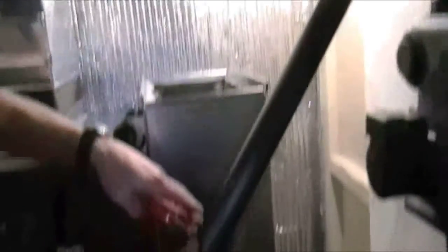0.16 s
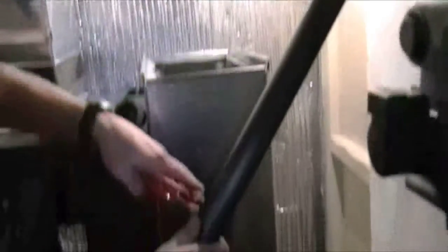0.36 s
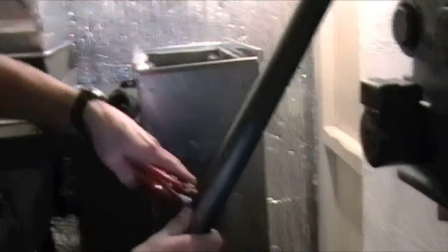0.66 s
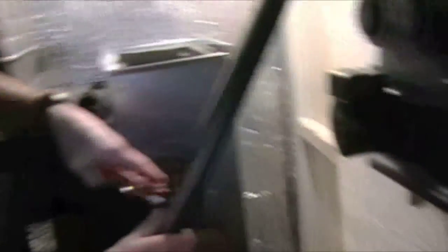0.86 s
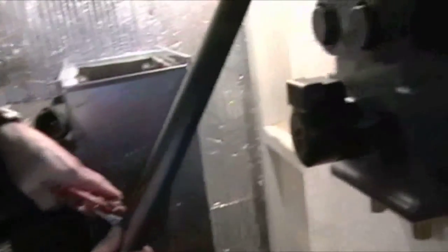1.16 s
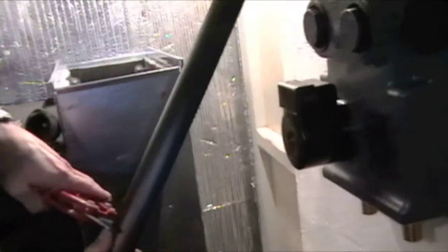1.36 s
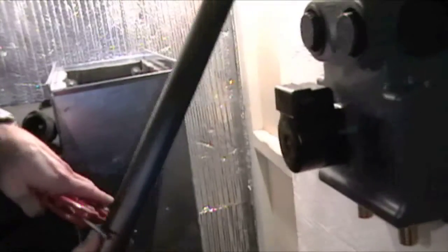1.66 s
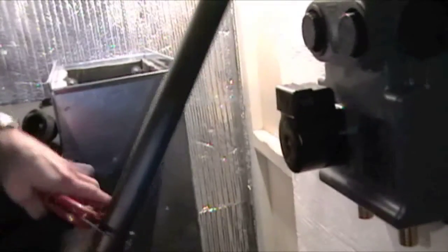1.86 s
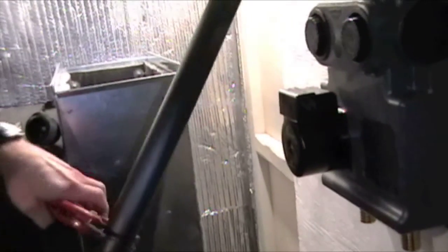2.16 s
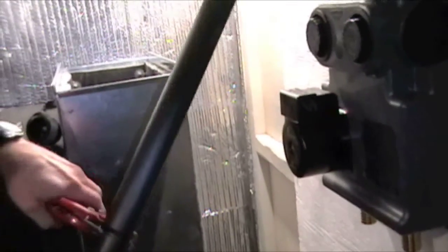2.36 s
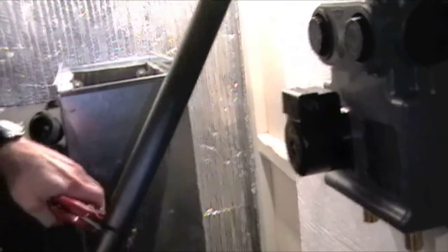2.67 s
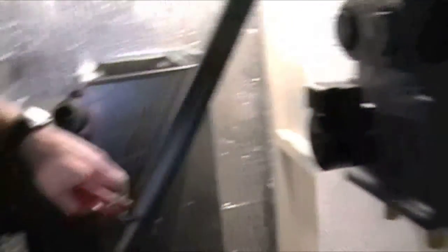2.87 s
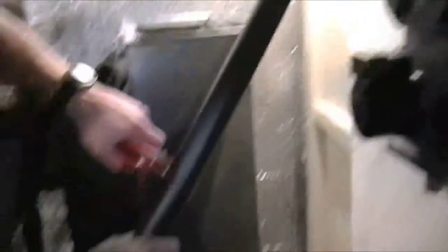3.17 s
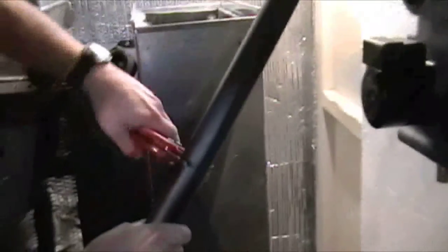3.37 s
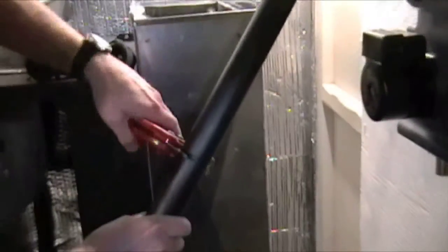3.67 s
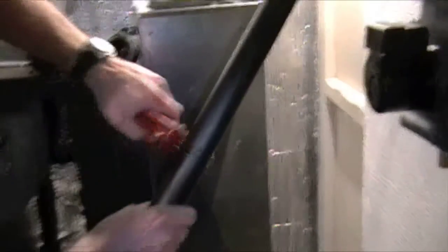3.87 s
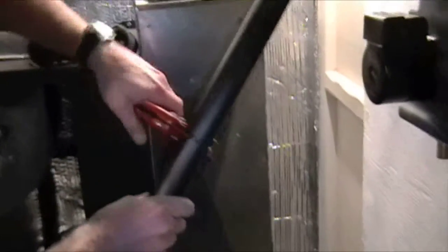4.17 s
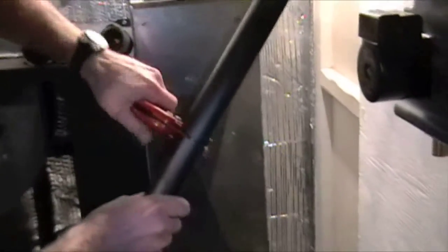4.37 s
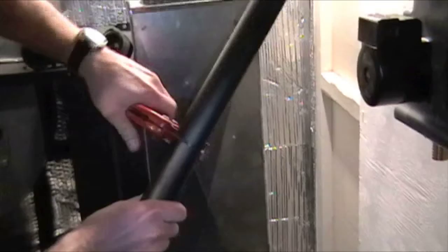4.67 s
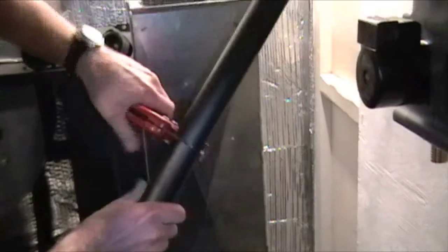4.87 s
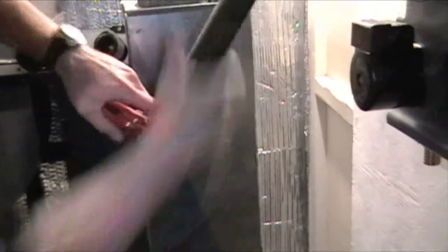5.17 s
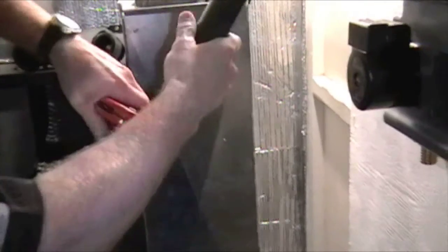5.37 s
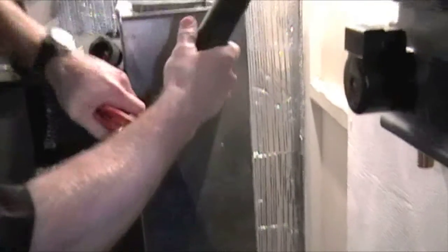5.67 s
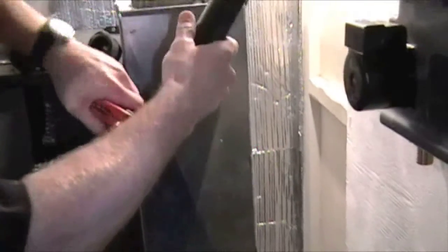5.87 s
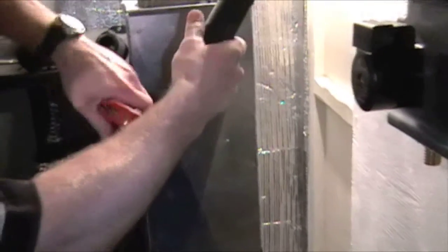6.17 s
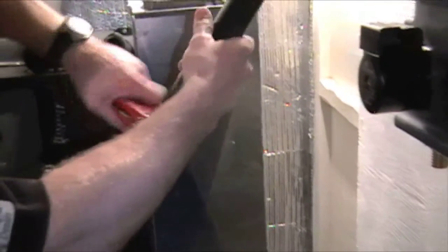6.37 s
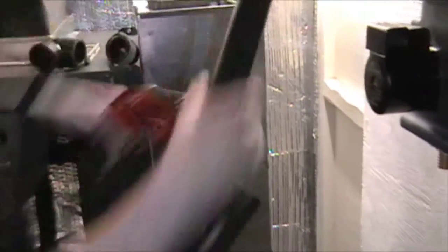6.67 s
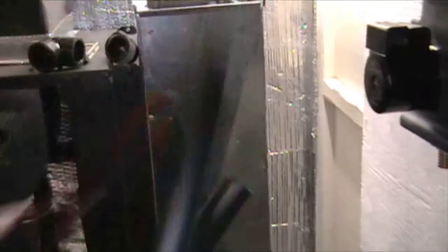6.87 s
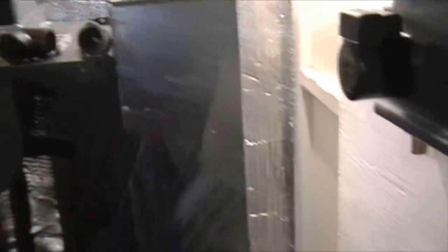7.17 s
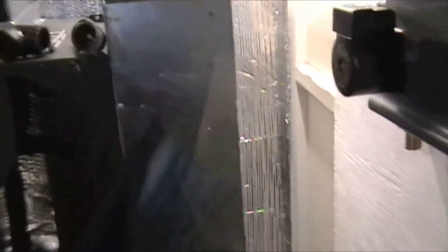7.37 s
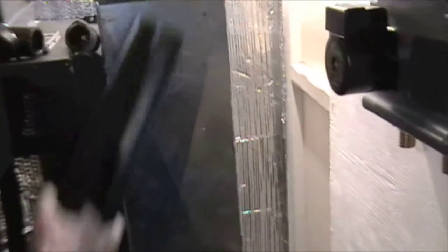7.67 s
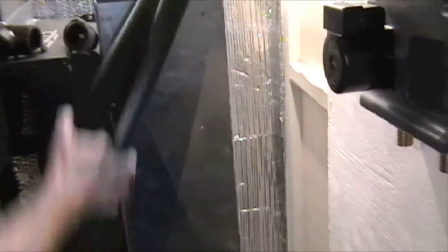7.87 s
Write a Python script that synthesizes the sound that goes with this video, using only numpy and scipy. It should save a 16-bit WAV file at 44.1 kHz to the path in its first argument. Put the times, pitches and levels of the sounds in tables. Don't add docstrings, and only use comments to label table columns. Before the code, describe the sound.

A small, hard-walled utility room heard close on a camcorder's stereo microphone, with soft air hiss, faint thin whine and a low pump hum that swells near 2 s. In the first second come only faint dull taps on the camera body. At 1.6 s the plastic pipe is knocked, hollow and short, followed by light clicks and a brush of hands at 1.8 s. From 3.1 s a ratchet cutter snaps hard: 3.15, 3.55, then about every 0.2 s until 5.7 s, each a chattering metallic crack with bright tick and quick room slap, lighter return clicks between. Blade scraping and rustling grow strongest around 5.2-6.2 s. More snaps cluster at 6.1-6.3 s, then after a pause two hollower cracks fall at 6.9 and 7.3 s. The pipe is set down with a hollow knock at 7.45 s, settles at 7.55 s, and fades into faint handling and hum.

```python
import sys
import numpy as np
from scipy import signal
from scipy.fft import rfft, irfft
from scipy.io import wavfile
from scipy.ndimage import uniform_filter1d

SR = 44100
rng = np.random.default_rng(int(sys.argv[2]) if len(sys.argv) > 2 else 0)


def gain_from_db(level_db):
    decades = np.asarray(level_db, float) / 20
    return 10 ** decades


def store_pcm(level_fs):
    pcm = np.round(np.clip(level_fs, -1, 1) * 32767).astype(np.int16)
    wavfile.write(sys.argv[1], SR, np.atleast_2d(pcm).T)


N = 353241
T = np.arange(N) / SR
HZ = np.fft.rfftfreq(N, 1 / SR)

# (time [s], tool level [dB], pipe level [dB], bright tick share [0-1], free ring [Hz])
SNAPS = [(3.148, -10, -36.5, 0.5, 5030), (3.559, -11, -38, 0.69, 5060), (3.8542, -9.5, -30.5, 0.39, 3480),
         (4.0633, -11, -29.5, 0.67, 1560), (4.2793, -8, -22, 0.32, 4880), (4.4878, -10.5, -46, 1, 2000),
         (4.568, -13, -34.5, .6, 3640), (4.6843, -8.5, -26.5, 0.58, 2670), (4.8886, -12, -31, 1, 6230),
         (5.0422, -8, -27, 0.47, 2810), (5.2954, -9, -40, 0.73, 2190), (5.5078, -9, -23, 0.39, 3910),
         (5.7189, -11.5, -63.5, 0.9, 2250), (6.086, -12, -32.5, .7, 3980), (6.1288, -14, -20.5, .05, 2190),
         (6.2734, -6, -26, 0.73, 5310), (6.8878, -12.5, -20.5, .6, 2280), (7.273, -11, -20, 0.6, 2800)]
RETURNS = [(1.8039, -30, -44, 0.49, 4650), (1.8514, -25, -31.5, 0.32, 4040),
           (3.1439, -17, -27.5, 0.69, 1974), (3.3253, -39.5, -44, 0.19, 2660),
           (4.0185, -33, -41.5, .05, 2650), (4.1544, -17.5, -36, 0.68, 4700),
           (4.4457, -34, -42.5, 0.86, 3600), (4.9401, -15, -27, .56, 2150), (5.3519, -24, -33, 0.15, 2226),
           (5.7678, -22, -32.5, .05, 4630), (5.7881, -14, -32.5, .83, 2340),
           (5.8832, -14.5, -26.5, 0.023, 4460), (6.0258, -36.5, -60, 0.83, 5790)]


def ratchet():
    return (blows(SNAPS, wet_db=-1.2, ring_db=-7.5, pawl_db=0, trim_db=0.22)
            + blows(RETURNS, wet_db=-1.0, ring_db=-3.5, pawl_db=0, trim_db=0.86))


# (frequency [Hz], width [Hz], level [dB])
PAWL = [(3830, 330, -18), (3980, 155, -2), (4664, 150, -4.5), (4920, 350, 4.5), (5650, 96, -23.5),
        (6230, 140, -9)]
# (frequency [Hz], level [dB], t60 [s])
PIPE = [(366, -18, 0.057), (446, -19.5, 1.3), (665.4, 10, 0.3), (721, 13.5, 0.068), (780, 4, 0.074),
        (1140, 5, 0.23)]
# (frequency [Hz], width [Hz], level [dB])
HANDLE = [(1560, 63, -10), (2190, 60, 0), (2766, 54, 0.5), (3030, 58, -2), (3485, 180, 0)]
# (frequency [Hz], width [Hz], level [dB])
TICK = [(7500, 96, -12), (8210, 25, 7.5), (9160, 120, 16.5), (11840, 130, -14.5), (13100, 140, -75)]


def blows(table, wet_db, ring_db, pawl_db, trim_db):
    out = np.zeros((3, N + SR))
    t = T[:SR // 16]
    damped_pipe = [(hz, db, min(t60_s, .05)) for hz, db, t60_s in PIPE]
    # (modes, crack low Hz, crack high Hz, crack dB)
    bodies = [(as_modes(PAWL, 5), 3300, 7000, 3),
              (damped_pipe, 230, 1500, 4),
              (as_modes(HANDLE, 4), 1200, 3600, 4),
              (as_modes(TICK, 5), 6800, 16500, 8)]
    click = 1. * (t == 0)
    cracks = [gain_from_db(db) * unit(band(click, lo_hz, hi_hz)) for _, lo_hz, hi_hz, db in bodies]
    for s, tool_db, pipe_db, bright, ring_hz in table:
        luck = rng.random((3, 300))
        chatter = 1.1 * (luck[0] < .15) * (luck[1] - .5) * np.exp(-t[:300] / .0017)
        chatter[0] = 1
        spot_angle = 2 * np.pi * luck[2, 0]
        sounds = [unit(unit(ring(body[0], 1.5, t)) + crack) for body, crack in zip(bodies, cracks)]

        bright = np.clip(bright, 0, 1)
        tool = gain_from_db(tool_db + trim_db)
        gains = np.array([gain_from_db(tool_db + pawl_db), gain_from_db(pipe_db), (1 - bright) * tool, bright * tool])
        first = gains / 10 @ sounds
        blow = signal.fftconvolve(first, chatter)[:len(t)]

        free_t60_s = max(.01, 24 / ring_hz)
        free_db = ring_db - 24 + 3 * (ring_hz > 3200)
        free = unit(np.sin(2 * np.pi * ring_hz * t) * gain_from_db(-60 * t / free_t60_s))
        free = gains.max() * gain_from_db(free_db) * free

        direct = blow + gain_from_db(1.5) * free
        sent = .5 * (first + blow) + free
        shares = gain_from_db(wet_db) * np.array([np.cos(spot_angle), np.sin(spot_angle)])
        i = int(s * SR)
        out[:, i:i + len(t)] += [direct, *np.outer(shares, sent)]
    return out[:, :N]


def as_modes(peaks, damp):
    return [(hz, db, np.log(1000) / (np.pi * width * damp)) for hz, width, db in peaks]


def ring(modes, scatter_db, t):
    hz, db, t60_s = np.transpose(modes)[:, :, None]
    luck = rng.standard_normal((3, len(modes), 1))
    level = np.sign(luck[0]) * gain_from_db(db + scatter_db * luck[1])
    tone = np.sin(2 * np.pi * hz * (1 + 0.012 * luck[2]) * t)
    return (level * tone * gain_from_db(-60 * t / t60_s)).sum(0)


# (time [s], tool level [dB], pipe level [dB], bright tick share [0-1], free ring [Hz])
KNOCKS = [
    (1.6278, -13, -15.5, 0.48, 657),
    (7.4585, -17.5, -11.5, 0.19, 778),
    (7.5594, -24, -19, 0.47, 834),
]


def knocks():
    return blows(KNOCKS, wet_db=-2.5, ring_db=-2.5, pawl_db=-3, trim_db=3.7)


# (time [s], tool level [dB], pipe level [dB], bright tick share [0-1], free ring [Hz])
TOUCHES = [(1.7601, -43, -54, 0.72, 4400), (2.7594, -57.5, -67, 0.33, 695), (3.2625, -47, -66, 0.23, 2870),
           (3.3745, -64, -56, .5, 1350), (3.7397, -68, -50, .6, 296), (4.0074, -57, -48.5, 0.47, 1970),
           (4.238, -47, -68, 0.69, 5250), (4.4342, -44, -42.5, 0.5, 3920), (4.8466, -42, -40.5, .1, 2000),
           (5.2141, -44, -51, 0.59, 3700), (5.659, -56, -56, 0.45, 2570), (5.682, -44, -62, 0.26, 2220),
           (6.5114, -48.5, -64.5, 0.7, 5250), (6.6295, -43, -50, 0.46, 1540),
           (6.777, -47.5, -68, 0.82, 5680), (7.016, -53, -54.5, 0.26, 370), (7.048, -47, -54, 0.63, 373),
           (7.8638, -49, -61, 1, 5850)]


def touches():
    return blows(TOUCHES, wet_db=-0.47, ring_db=-0.51, pawl_db=-6, trim_db=1.5)


# (time [s], frequency [Hz], level [dB], t60 [s], spread [share of pitch])
NOTES = [(3.56, 700, -30, .06, .12), (1.628, 76, -33, 0.083, 0.43), (3.5, 79, -43.5, 0.081, .6),
         (5.5, 86.4, -37.5, .07, 0.55), (7.62, 75.6, -47, 0.99, 0.58), (1.629, 235.2, -24, 0.069, 0.14),
         (1.629, 697, -25, 0.063, .08), (1.803, 3510, -40, 0.083, 0.034), (4.569, 3610, -26, 0.061, .05),
         (6.275, 4940, -22, .12, 0.062), (6.888, 338, -32, 0.14, 0.088), (6.889, 445, -49.5, 0.48, 0.2),
         (7.01, 1725, -72, 1, 0.024), (6.888, 1400, -37, 0.066, 0.7), (7.272, 441.5, -32.5, 0.26, .12),
         (7.273, 1390, -31, 0.12, 0.99), (7.458, 366, -20.5, 0.14, .06), (7.457, 400, -24.5, 0.13, 0.033),
         (7.458, 500, -24, 0.14, 0.78), (8.2, 110, -36.5, 0.6, 0.27), (7.56, 250, -35, 0.31, .6),
         (7.56, 431.5, -29, 0.11, 0.045), (7.56, 740, -27.5, 0.088, 0.42)]


def lingering_notes():
    out = np.zeros(N + SR)
    t = T[:SR // 2]
    for s, hz, db, t60_s, spread in NOTES:
        wide = 1 + max(spread, .005)
        waver = unit(band(rng.standard_normal(len(t)), hz / wide, hz * wide))
        waver = waver + 0.45 * np.sin(2 * np.pi * hz * t)
        i = int(s * SR)
        out[i:i + len(t)] += gain_from_db(db - 60 * t / t60_s) * waver
    return out[:N]


# (start [s], length [s], level [dB])
DRONES = [
    (-.1, 0.44, -63.5),
    (2.8, 0.81, -55.5),
    (3.86, 0.16, -57.5),
    (4.0, 1.3, -67),
    (5.298, 0.31, -43),
    (5.65, 0.71, -63),
    (6.85, 0.41, -64.5),
    (7.271, 0.38, -51),
    (7.6, 0.6, -77.5),
]
SCRAPES = [(1.5, 0.32, -60), (1.75, 0.07, -57.5), (2.75, 0.72, -70.5), (3.251, 0.14, -62),
           (3.781, 0.16, -54.5), (4.0, 0.41, -52.5), (4.43, 0.69, -56.5), (5.2, 0.38, -43.5),
           (5.66, 0.24, -43.5), (6.021, 0.19, -42.5), (6.3, 0.74, -62.5), (7.55, 0.1, -45.5),
           (6.95, 0.33, -65.5), (7.66, 0.23, -66.5), (7.85, 0.29, -60)]
RUSTLES = [
    (1.84, .2, -49),
    (2.75, 0.089, -62),
    (3.3, 0.061, -61),
    (3.79, 0.094, -55),
    (4.1, 1, -74),
    (5.182, 0.41, -47),
    (6.5, 0.44, -62.5),
    (7.299, 0.25, -52),
    (7.85, .2, -59),
]
RUMBLES = [
    (-.1, 0.19, -50),
    (3.7, .08, -57),
    (4.0, .7, -66),
    (5.3, 0.22, -51),
    (5.752, 0.19, -63.5),
    (6.1, 0.45, -53.5),
    (6.8, 0.31, -58.5),
    (7.441, 0.65, -51),
]
# drone, scrape, rustle, rumble (level [dB])
SETTLE_DB = [-50.5, -37.5, -42.5, -56.5]


def rubbing():
    flicker_db, settle_t60_s = 5, 0.5
    grain_level = gain_from_db(1.0 * rng.exponential(size=N) * (rng.random(N) < .05))
    grains = rng.standard_normal(N) * grain_level

    drone = band(grains, 410, 510) + .5 * band(grains, 335, 385) + 0.18 * band(grains, 170, 1200)
    scrape = 6.5 * band(grains, 990, 7400)
    for hz, width_hz, db in HANDLE + PAWL:
        scrape = scrape + gain_from_db(db) * band(grains, hz - width_hz, hz + width_hz)
    rustle = band(grains, 4200, 20000)
    rumble = band(grains, 70, 440)

    settle = 0
    for s, db, *_ in SNAPS + RETURNS:
        settle = settle + (T > s) * gain_from_db(db - 60 * np.abs(T - s) / settle_t60_s)

    out = 0
    tables, sounds = [DRONES, SCRAPES, RUSTLES, RUMBLES], [drone, scrape, rustle, rumble]
    for table, settle_db, sound in zip(tables, SETTLE_DB, sounds):
        pressure = strokes(table) + gain_from_db(settle_db) * settle
        out = out + pressure * gain_from_db(flicker_db * walk(30) - 11.0) * unit(sound)
    return out


def strokes(table):
    rise, fall = 0.21, 0.22
    s, length_s, db = np.transpose(table)[:, :, None]
    along = (T - s) / length_s
    shape = np.clip(np.minimum(along / rise, (1 - along) / fall), 0, 1)
    return (gain_from_db(db) * shape).sum(0)


# (time [s], tool level [dB], pipe level [dB], bright tick share [0-1], free ring [Hz])
TAPS = [
    (0.0392, -67, -50.5, .25, 471),
    (0.24, -54.5, -66.5, .15, 1660),
    (0.9875, -71, -45.5, .45, 352),
]


def camera_taps():
    return blows(TAPS, wet_db=-19, ring_db=1.3, pawl_db=-15, trim_db=1.5)


# (frequency [Hz], t60 [s], tail energy [dB])
ROOM = [(100, 0.08, -12.5), (324.6, 0.29, -2.5), (754, 0.14, 4.5), (2000, 0.15, 7), (4850, 0.16, -6),
        (8000, .15, 0.5), (12300, 0.2, 0)]


def echo():
    t = T[:SR // 2]
    out = 0
    hz, t60_s, db = np.transpose(ROOM)
    for f in 45 * 2 ** np.arange(0, 8.6, .5):
        band_t60_s = np.interp(np.log(f), np.log(hz), t60_s)
        band_db = np.interp(np.log(f), np.log(hz), db)
        fade = gain_from_db(-60 * t / band_t60_s) * np.clip(t / 0.0011, 0, 1)
        tail = band(rng.standard_normal(len(t)), f / 2 ** 0.3, f * 2 ** 0.4)
        out = out + tail * fade / np.sqrt(np.sum(fade ** 2)) * gain_from_db(band_db)
    return out


# (time [s], level [dB])
HUM = [(0.0, -83), (0.94, -78), (1.43, -68.5), (1.92, -64), (2.7, -78.5), (3.75, -78.5), (4.4, -81.5),
       (5.75, -79.5), (6.4, -71.5), (7.2, -84), (8.01, -68)]
# (frequency [Hz], width [Hz], level [dB])
DRUM = [(156, 3.2, -80), (749, 21, -77), (2546, 11, -79.5), (4650, 210, -78.5), (9200, 40, -90),
        (11380, 370, -78)]
# (frequency [Hz], density [dB per Hz])
AIR = [(25, -22), (130, -3.5), (300, -3.5), (800, -5.5), (2500, -8), (3800, -15), (7300, -16.5),
       (16000, -15)]
# (frequency [Hz], level [dB])
AIR_SIDE = [(60, -15), (300, 2), (2000, -1.5), (8000, -1)]


def background():
    air_db, hum_hz = -64, 94.6
    noise = rng.standard_normal((3, N))
    air = colour(noise[0], AIR) * gain_from_db(0.61 * walk(2.0))
    air_side = colour(colour(noise[1], AIR), AIR_SIDE) / np.sqrt(np.mean(air ** 2))
    hum_level = gain_from_db(np.interp(T, *np.transpose(HUM)) + 3.5)
    hum = hum_level * np.sin(2 * np.pi * (hum_hz * T + .1 * walk(1.9)))
    drum = 0
    for hz, width_hz, db in DRUM:
        drum = drum + gain_from_db(db) * unit(band(noise[2], hz - width_hz / 2, hz + width_hz / 2))
    mid = gain_from_db(air_db) * unit(air) + hum + drum
    return mid, gain_from_db(air_db) * air_side + .14 * mid


# (frequency [Hz], level [dB])
MIC = [(30, -15), (100, -7.5), (250, 3.5), (500, 3), (10000, 8), (13000, 2), (15500, -13), (17000, -42)]
# (frequency [Hz], level [dB])
WIDTH = [(60, -4.5), (110, -5.5), (200, -18.5), (380, -28.5), (900, -24), (2380, -17), (8120, -9),
         (15000, -1)]


def microphones(mid, side):
    return colour(mid, MIC), colour(colour(side, MIC), WIDTH)


def colour(x, points):
    hz, db = np.transpose(points)
    grid_hz = np.fft.rfftfreq(4096, 1 / SR)
    cepstrum = irfft(np.log(gain_from_db(np.interp(np.log(grid_hz + 1), np.log(hz), db))))
    cepstrum[1:2048] *= 2
    cepstrum[2049:] = 0
    return signal.oaconvolve(x, irfft(np.exp(rfft(cepstrum))))[:N]


def band(x, lo_hz, hi_hz):
    return signal.sosfilt(signal.butter(2, [lo_hz, hi_hz], "band", fs=SR, output="sos"), x)


def unit(x):
    return x / np.sqrt(np.mean(x ** 2))


def walk(rate_hz):
    k = int(SR / rate_hz)
    held = np.repeat(rng.standard_normal(N // k + 1), k)
    return .5 * uniform_filter1d(uniform_filter1d(held, k), k)[:N]


def scene():
    direct, *spots = ratchet() + knocks() + touches() + camera_taps()
    rub = rubbing() + lingering_notes()
    direct = direct + rub
    spots[0] = spots[0] + rub

    smear = rng.standard_normal(200) * np.exp(-T[:200] / 0.00046)
    smear = 0.84 * smear / np.sqrt(np.sum(smear ** 2))
    mid = direct + sum(signal.fftconvolve(spot, echo())[:N] for spot in spots)
    side = np.convolve(direct, smear)[:N] + signal.fftconvolve(direct, echo())[:N]

    mid, side = microphones(mid, side)
    still_mid, still_side = background()
    mid, side = mid + still_mid, side + still_side
    return np.array([mid + side, mid - side])


def top_cut(x):
    return signal.sosfilt(signal.butter(12, 17060, fs=SR, output="sos"), x)


def record(dry):
    x = dry / (1 + (np.abs(dry) / .7) ** 6) ** (1 / 6)
    turn_300 = np.exp(-2j * np.pi * HZ / 300)
    turn_600 = np.exp(-2j * np.pi * HZ / 600)
    depth = 1.01 / (1 + (HZ / 5200) ** 6)
    notch_300 = (1 - depth * turn_300) / (1 - 0.868 * depth * turn_300)
    notch_600 = (1 - 0.88 * turn_600) / (1 - 0.79 * turn_600)
    low_cut = 1j * HZ / (45 + 1j * HZ)
    high_cut = 1 / np.sqrt(1 + (HZ / 16200) ** 60)
    mix = irfft(rfft(x) * notch_300 * notch_600 * low_cut * high_cut, N)
    return top_cut(mix)


dry = scene()
out = record(dry)
store_pcm(out)
```